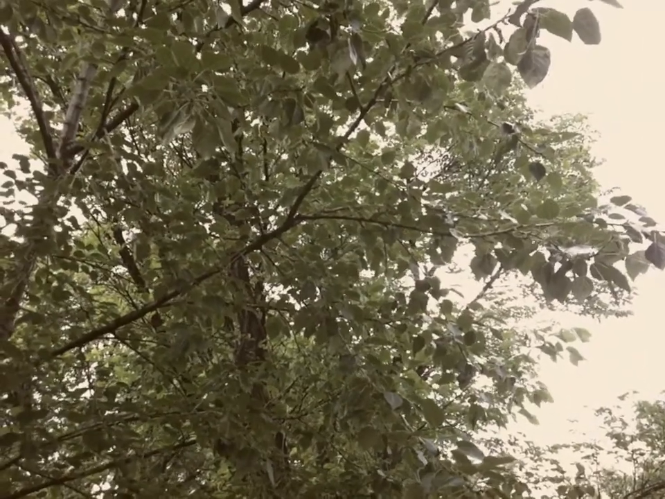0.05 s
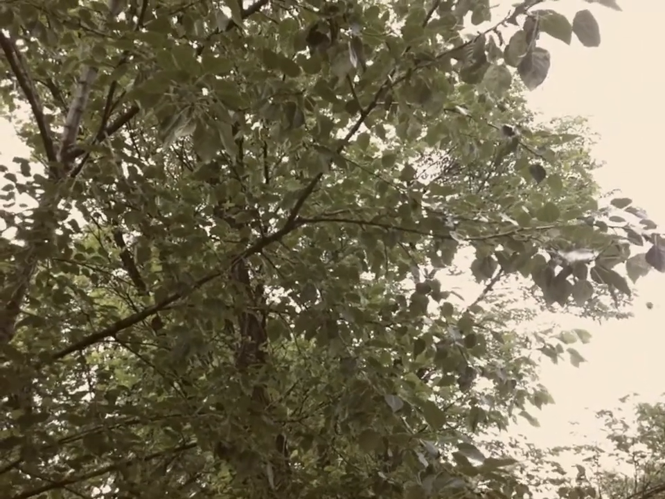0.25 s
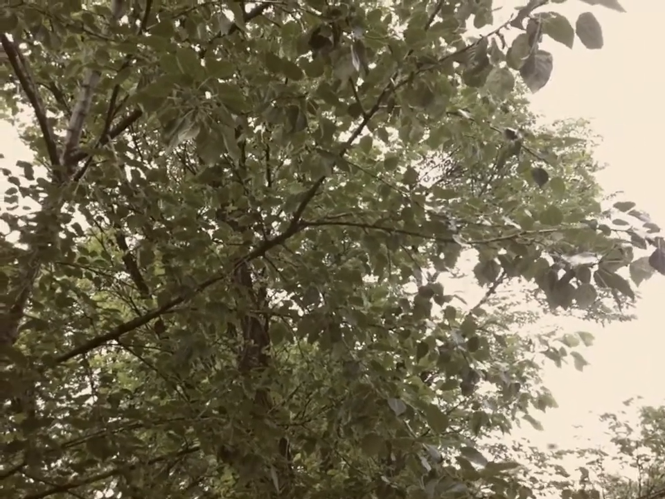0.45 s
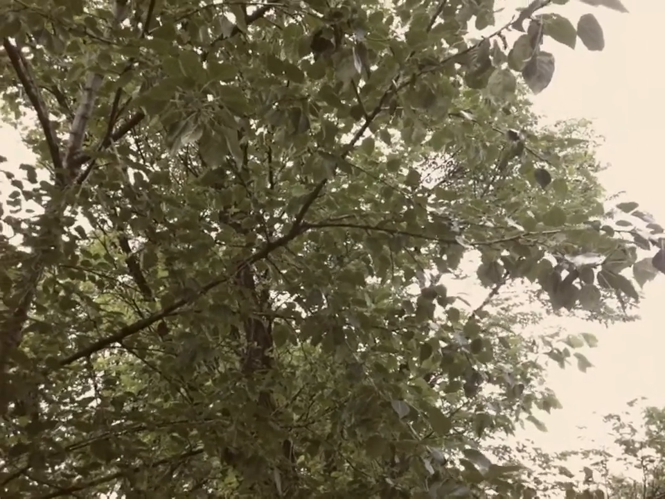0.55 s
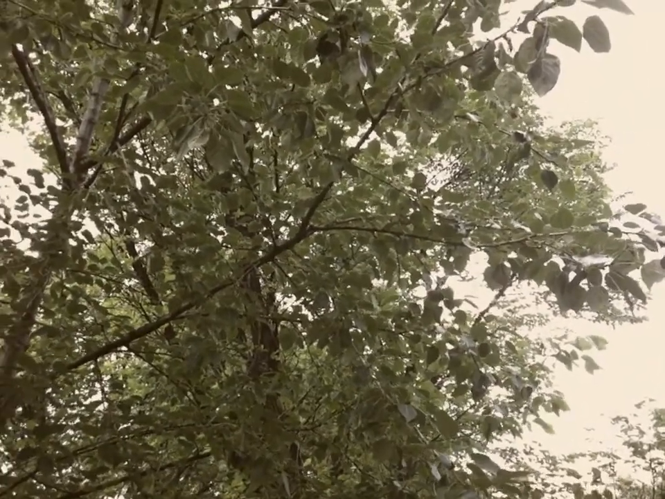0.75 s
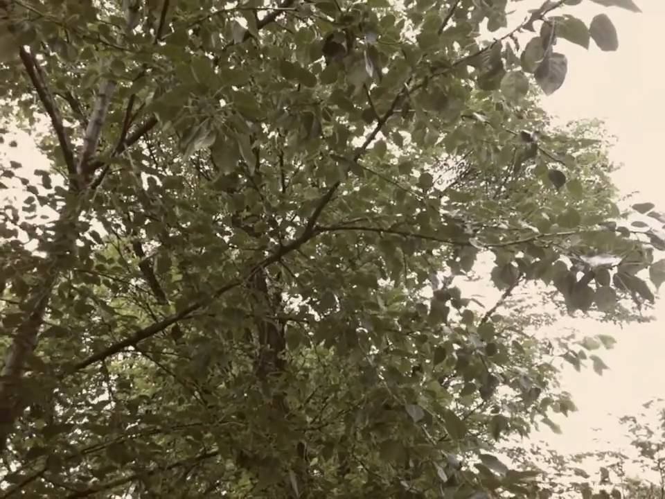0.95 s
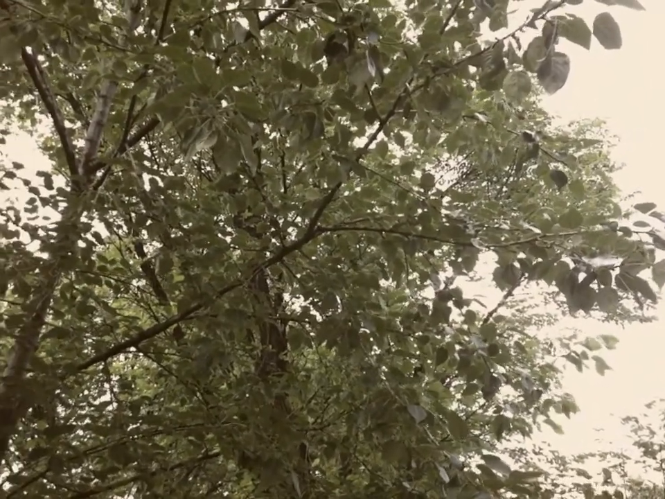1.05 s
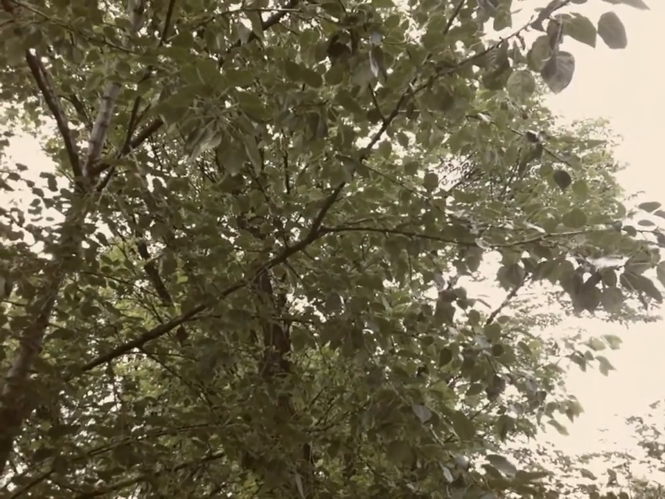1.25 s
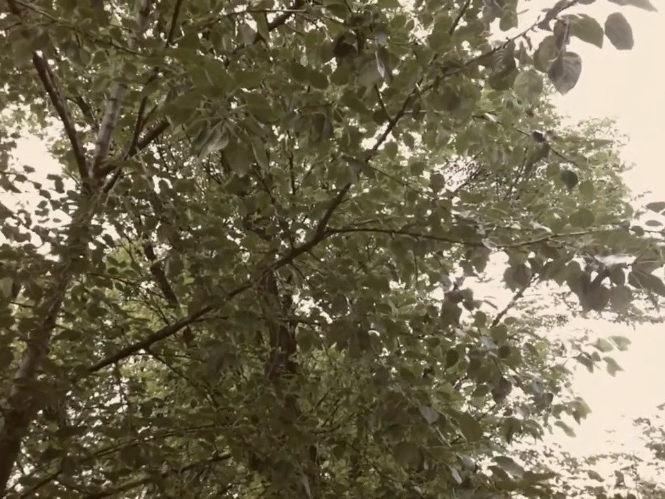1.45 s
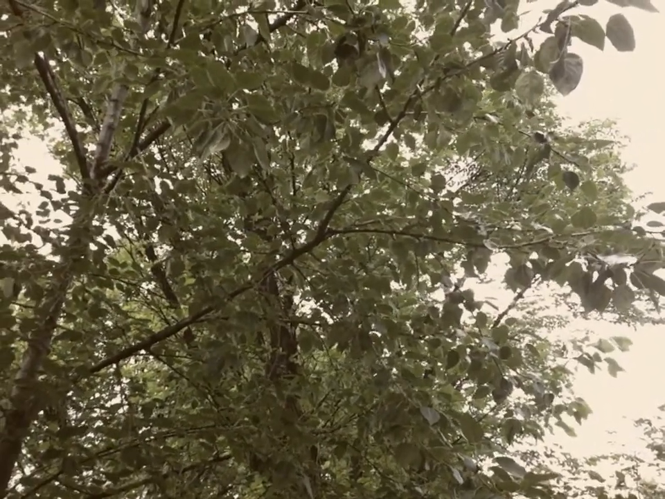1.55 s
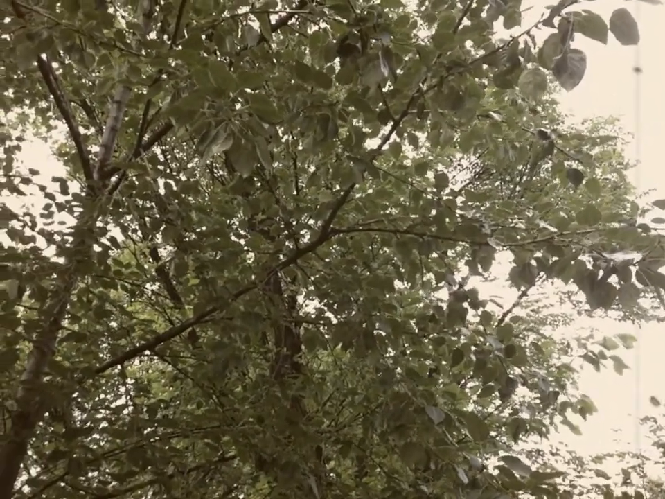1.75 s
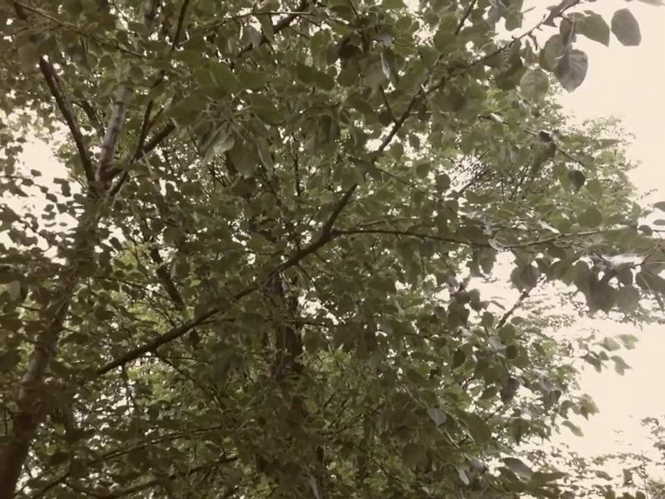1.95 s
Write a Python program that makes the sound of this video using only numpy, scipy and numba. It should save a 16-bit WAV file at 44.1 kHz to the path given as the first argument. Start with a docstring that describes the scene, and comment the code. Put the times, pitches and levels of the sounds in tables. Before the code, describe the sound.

A magpie in a leafy tree gives a faint first note, then six harsh rasping syllables in quick, even succession, each ending in a short rising squawk; leaves scatter the sound over quiet distant rumble outdoors.

```python
"""Distant rumble runs throughout; a low hum drops out briefly, and a drone with a faint whine stops early.
Over it a magpie chatters in a leafy tree: a faint note, then six harsh syllables, about four a second.
Each swells as a narrow rasp of irregular pulses and hiss, opens into a broad bright one and ends on
a short half-voiced note of rough partials that glides up, with a brief ring; two small squeaks fall between.
Leaves and branches scatter each call, and the surroundings answer with smeared echoes and a faint tail."""
import sys
import numpy as np
from scipy import signal
from scipy.fft import rfft, irfft
from scipy.io import wavfile
from scipy.ndimage import uniform_filter1d
from numba import njit

SR = 44100
rng = np.random.default_rng(int(sys.argv[2]) if len(sys.argv) > 2 else 0)


def wav_record(signal):
    """Record a signal, one row per channel, as 16-bit PCM in the file named by sys.argv[1]."""
    frames = np.transpose(np.atleast_2d(signal))
    bounded = np.clip(frames, -1, 1)
    # unit amplitude maps onto the largest positive 16-bit level
    quanta = np.round(bounded * 32767).astype(np.int16)
    wavfile.write(sys.argv[1], SR, quanta)


N = 88200
TIME = np.arange(N) / SR
RATTLE_HZ, RATTLE_DB = 160, 0.5  # bandwidth and spread of the random rattle

# The calls; levels are before the tree, the echoes and the bird's overall trim.
# (start [s], peak [s], 20 dB rise of the narrow rasp [s], pitch at the peak [Hz],
#  glide after the peak [oct/s], upper formant [Hz], narrow rasp [dB], open rasp [dB],
#  voiced note [dB], ring [dB], 10 dB fall of the open rasp [s])
SYLLABLES = [ (-0.10, 0.018, 0.080, 968.5, -1, 2037, -42, -51.5, -46.5, -53.5, 0.045),
             (0.182, 0.358, 0.17, 900, 1.5, 3840, -37.5, -35, -38, -52, 0.069),
             (0.445, 0.588, 0.14, 936.7, -1.5, 4430, -36, -34, -39, -46.5, 0.027),
             (0.707, 0.835, 0.13, 919.7, -1.34, 4430, -38.5, -33.5, -39.5, -46.5, 0.021),
             (0.923, 1.063, 0.15, 930, 4, 5260, -39.5, -31, -34, -46.5, 0.023),
             (1.155, 1.28, 0.110, 936, 4.5, 5300, -38.5, -32.5, -31.5, -43.5, 0.031),
             (1.395, 1.498, 0.092, 941, 7, 5500, -37.5, -32.5, -30, -55, 0.031)]


def from_db(db):
    """Decibels to an amplitude factor."""
    return 10 ** (np.asarray(db) / 20)


def rms_one(x):
    """Scale to an RMS level of 1."""
    return x / np.sqrt(np.mean(x ** 2) + 1e-20)


def even(x):
    """Hold the level steady over about 20 ms."""
    return x / np.sqrt(uniform_filter1d(x ** 2, size=900) + 1e-12)


def drift(rate_hz):
    """Smooth chance with spread 1: noise through two equal one-pole low-passes."""
    r = np.exp(-2 * np.pi * rate_hz / SR)
    noise = rng.standard_normal(2 * N)
    settled = signal.lfilter([1], [1, -2 * r, r * r], noise)[N:]
    return rms_one(settled)


def colour(x, points):
    """Filter by a (frequency [Hz], level [dB]) curve, straight over log frequency."""
    hz, db = np.transpose(points)
    f = np.maximum(np.fft.rfftfreq(2 * len(x), 1 / SR), 1)
    gain = from_db(np.interp(np.log(f), np.log(hz), db))
    return irfft(rfft(x, 2 * len(x)) * gain)[:len(x)]


def resonate(x, hz, width_hz):
    """One two-pole resonance, gain 1 on top."""
    r = np.exp(-np.pi * width_hz / SR)
    zeros = np.array([1, 0, -1]) * (1 - r * r) / 2
    poles = [1, -2 * r * np.cos(2 * np.pi * hz / SR), r * r]
    return signal.lfilter(zeros, poles, x)


def background():
    """Coloured-noise rumble, a sine hum with a gap, and a wavering sine drone with a whine of ringing noise."""
    # Rumble colour, relative: (frequency [Hz], level [dB])
    rumble_colour = [(25, -16), (42, -13), (70, -16.5), (110, -2), (160, -4), (250, 2.5), (400, -3.5),
                     (700, -6.5), (1300, -12), (2500, -18.5), (4000, -24), (8000, -35.5), (15000, -35)]
    # When the hum is away: (fade-out begins [s], fade-in ends [s])
    hum_gap = (.47, .59)
    drone_end_s = 0.597

    rumble = from_db(-52.5) * rms_one(colour(rng.standard_normal(N), rumble_colour))

    gap = np.clip(np.minimum(TIME - hum_gap[0], hum_gap[1] - TIME) / 0.021, 0, 1)
    hum = from_db(-68.5) * (1 - gap) * rms_one(np.sin(2 * np.pi * 56 * TIME))

    drone_db = -63.5 + 1.2 * drift(8.3)
    drone = from_db(drone_db) * rms_one(np.sin(2 * np.pi * 98.3 * TIME))
    whine = from_db(-63) * rms_one(resonate(rng.standard_normal(N), hz=726, width_hz=7.4))
    fade_out = np.clip((drone_end_s - TIME) / .02, 0, 1)
    return rumble + hum + (drone + whine) * fade_out


def swell(end, attack, hold, release):
    """Rise, hold until the end time, fall; attack and release are the times [s] for 10 dB."""
    before = np.maximum(end - hold - TIME, 0)
    after = np.maximum(TIME - end, 0)
    return from_db(-10 * before / attack - 10 * after / release)


def since_peak():
    """The current syllable's index and the time from its peak."""
    starts, peaks = np.transpose(SYLLABLES)[:2]
    k = np.searchsorted(starts[1:], TIME)
    return k, TIME - peaks[k]


def pitch():
    """The pitch glides up to each syllable's peak, then rises on or sags."""
    rise_oct_per_s, span_s = 6.0, .045
    hz, after = np.transpose(SYLLABLES)[3:5]
    k, since = since_peak()
    slope = np.where(since < 0, rise_oct_per_s, after[k])
    return hz[k] * 2 ** (slope * np.clip(since, -span_s, span_s))


def rasp(hz, throat):
    """Irregular pulses of the syrinx and some hiss, rattling, through the throat."""
    jitter, pulse_spread_db, hiss_share = .22, 1.5, 0.64
    cycles = np.cumsum(hz * (1 + jitter * drift(500))) / SR
    new_cycle = np.diff(np.floor(cycles), prepend=0) > 0
    pulses = new_cycle * from_db(pulse_spread_db * rng.standard_normal(N))
    breath = rms_one(pulses) + hiss_share * rng.standard_normal(N)
    source = breath * from_db(RATTLE_DB * drift(RATTLE_HZ))
    return even(colour(source, throat))


@njit
def moving_high_pass(x, step, damping):
    """State-variable high-pass with a moving, resonant edge."""
    out, low, band = np.zeros(len(x)), 0., 0.
    for i in range(len(x)):
        low += step[i] * band
        out[i] = x[i] - low - damping * band
        band += step[i] * out[i]
    return out


def rough_tone(hz, jitter):
    """A rattling sine with an unsteady pitch."""
    phase = 2 * np.pi * np.cumsum(hz * (1 + jitter * drift(390))) / SR
    return rms_one(np.sin(phase) * from_db(RATTLE_DB * drift(RATTLE_HZ)))


def note(hz):
    """At each peak the syrinx briefly locks into a rough harmonic tone."""
    # Partials, with half steps from period doubling:
    # (multiple of the pitch, mean level [dB], delay of its peak [s])
    partials = [(2, -9, -0.020), (2.5, -12, -0.016), (3, 0, 0.002), (3.5, -13, -0.004), (4, -20, -0.015),
                (5, -5, -0.003), (5.5, -11, 0.006), (6, -11, -0.004), (8, -24, 0.000), (9, -28, 0.000)]
    attack_s, hold_s, release_s = .014, .012, .014
    jitter, flutter_db = .015, 2.0

    phase = 2 * np.pi * np.cumsum(hz * (1 + jitter * drift(222))) / SR
    level = np.zeros(N)
    for _, peak_s, *_, note_db, _, _ in SYLLABLES:
        level += from_db(note_db) * swell(peak_s + hold_s / 2, attack_s, hold_s, release_s)

    out = np.zeros(N)
    for multiple, db, delay_s in partials:
        flutter = from_db(db + flutter_db * drift(174))
        delayed_level = np.interp(TIME - delay_s, TIME, level)
        out += flutter * delayed_level * np.sin(multiple * phase + rng.uniform(0, 2 * np.pi))
    return out


def magpie():
    """Every syllable passes from narrow rasp through open rasp to the note and a short ring."""
    # Throat colours, relative: (frequency [Hz], level [dB])
    narrow_throat = [(900, -16), (1350, -17.5), (1550, -16.5), (1900, -14), (2200, -2.5), (2500, -9),
                     (2750, -9.5), (2950, 1), (3200, -6), (3600, -10), (4300, -15.5), (5400, -11),
                     (6500, -15), (8500, -25.5), (12500, -44), (15000, -47)]
    open_throat = [(1000, -10.5), (1400, -14.5), (1750, -12.5), (2300, -3), (3300, 1.5), (3800, -2.5),
                   (4600, 0), (5500, 2), (6200, -4), (6900, -6), (8000, -5), (11000, -16.5), (12600, -25.5),
                   (15000, -31.5)]
    # The throat's resonant lower edge climbs through each syllable: (time from the peak [s], edge [Hz])
    edge = [(-0.09, 1490), (-0.045, 1560), (-0.02, 1760), (0.0, 2050), (0.03, 2500)]
    edge_damping = .45
    whistle_hz, whistle_db = 2950, -4.5  # level against the narrow rasp
    ring_hz, ring_sag_oct_per_s = 2790, 1.9
    upper_width_hz, upper_db = 1250, 1
    narrow_lead_s, onset_s = 0.057, .02

    hz = pitch()
    _, since = since_peak()
    step = 2 * np.sin(np.pi * np.interp(since, *np.transpose(edge)) / SR)
    narrow = even(moving_high_pass(rasp(hz, narrow_throat), step, edge_damping))
    wide = even(moving_high_pass(rasp(hz, open_throat), step, edge_damping))
    # a rough whistle pierces the narrow rasp
    narrow = narrow + from_db(whistle_db) * rough_tone(whistle_hz, jitter=.04)
    sagging_hz = ring_hz * 2 ** (-ring_sag_oct_per_s * np.maximum(since, 0))
    ring = rough_tone(sagging_hz, jitter=.03)

    out = note(hz)
    for start, peak_s, rise_s, _, _, upper_hz, narrow_db, open_db, _, ring_db, release_s in SYLLABLES:
        onset = np.clip((TIME - start) / onset_s, 0, 1)
        bright = rms_one(wide + from_db(upper_db) * resonate(wide, upper_hz, upper_width_hz))
        # half of a 20 dB rise time is the attack for 10 dB; the open rasp swells faster
        narrow_swell = swell(peak_s - narrow_lead_s, attack=rise_s * .5, hold=0, release=0.043)
        open_swell = swell(peak_s + 0.0068, attack=rise_s * 0.31, hold=0.032, release=release_s)
        ring_swell = swell(peak_s + 0.021, attack=0.0062, hold=0, release=0.03)
        out += onset * from_db(narrow_db) * narrow * narrow_swell
        out += onset * from_db(open_db) * bright * open_swell
        out += from_db(ring_db) * ring * ring_swell
    return out


def squeak():
    """Short rough falling notes, each a fundamental and its octave under a bell-shaped swell."""
    # Small squeaks, level before the tree, the echoes and the bird's trim:
    # (time [s], half length [s], pitch [Hz], fall [oct/s], level [dB], fundamental against the octave [dB])
    small_squeaks = [(0.395, .032, 1130, 2.2, -60, 10), (1.377, .014, 1770, 8, -47, -7)]
    jitter = .06
    out = np.zeros(N)
    for middle_s, half_s, hz, fall, db, fundamental_db in small_squeaks:
        glide = hz * 2 ** (-fall * np.clip(TIME - middle_s, -2 * half_s, 2 * half_s))
        phase = 2 * np.pi * np.cumsum(glide * (1 + jitter * drift(407))) / SR
        tone = rms_one(np.sin(2 * phase) + from_db(fundamental_db) * np.sin(phase))
        out += from_db(db) * np.exp(-((TIME - middle_s) / half_s) ** 2) * tone
    return out


def foliage(x):
    """Paths through the tree add up at a few narrow frequencies."""
    # Reinforced frequencies, against the direct call: (frequency [Hz], level [dB])
    reinforced = [(1528, 3.5), (1859, -1), (2038, -28), (2224, -2), (2563, -5), (2695, 0), (2813, 1),
                  (2893, -10.5), (2986, -5), (4307, -3), (4655, 5), (4920, -2), (5094, -24), (5279, -4)]
    return x + sum(from_db(db) * resonate(x, hz, width_hz=30) for hz, db in reinforced)


def scatter(delay_s, t60_s):
    """Sparse random reflections after a delay, dying away by 60 dB in t60, with total energy 1."""
    sparse = rng.standard_normal(N) * (rng.random(N) < .15)
    decay = from_db(-60 * np.maximum(TIME - delay_s, 0) / t60_s)
    twigs = sparse * (TIME > delay_s) * decay
    return twigs / np.sqrt(np.sum(twigs ** 2) + 1e-20)


def outdoors(x):
    """Close scatter from the foliage, a few smeared echoes and a faint tail."""
    # Dull echoes, level before the echo colour: (delay [s], level [dB])
    echoes = [(0.07, -22), (0.119, -21.5), (.162, -28.5)]
    # Colour of echoes and tail: (frequency [Hz], level [dB])
    echo_colour = [(1000, 1), (2000, -1), (2750, 1.5), (3700, -4.5), (5000, -2), (8000, 0.5), (15000, -9)]
    near = from_db(-7) * scatter(0.0024, t60_s=0.044)
    far = from_db(-10.5) * scatter(0.0067, t60_s=0.67)
    for delay_s, db in echoes:
        far += from_db(db) * scatter(delay_s, t60_s=0.035)
    response = near + colour(far, echo_colour)
    return x + signal.fftconvolve(x, response)[:N]


def scene():
    """The bird in its tree over the background."""
    bird_trim_db = -1
    bird = outdoors(foliage(magpie() + squeak()))
    return (from_db(bird_trim_db) * bird + background())[None]


def record(dry):
    """A steep linear-phase low-pass cuts the top."""
    low_pass = signal.firwin(numtaps=801, cutoff=15250, fs=SR)
    return signal.fftconvolve(dry, low_pass[None], mode="same")


dry = scene()
out = record(dry)
wav_record(out)
```